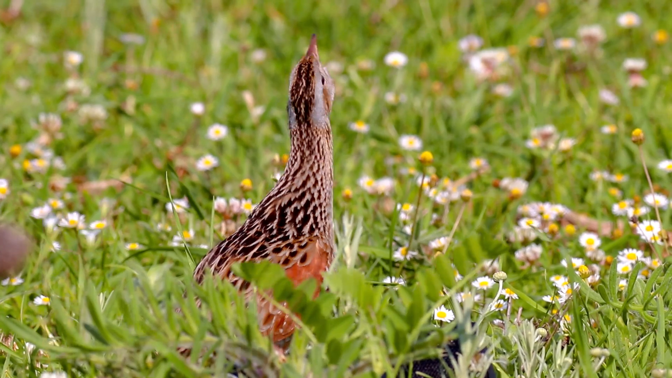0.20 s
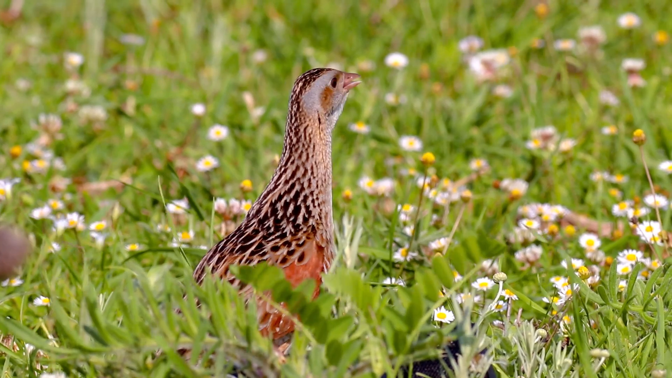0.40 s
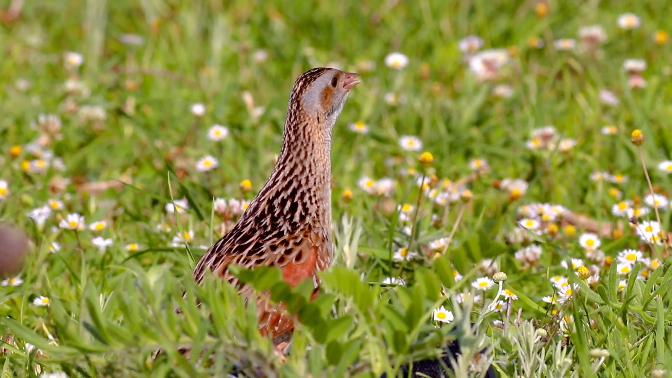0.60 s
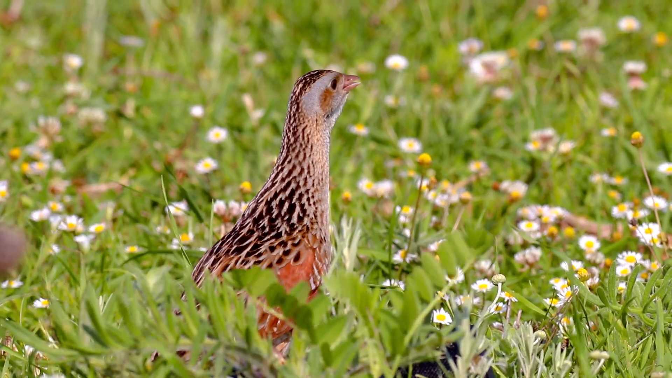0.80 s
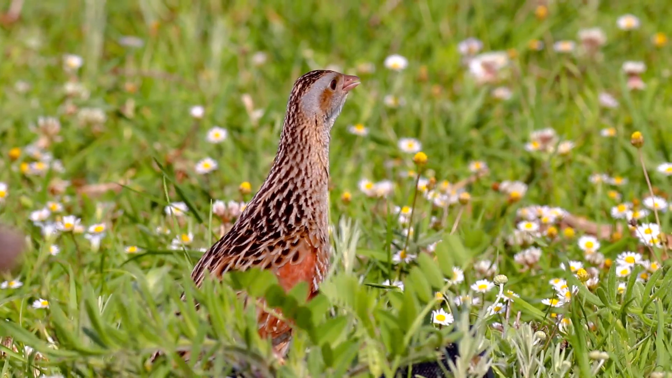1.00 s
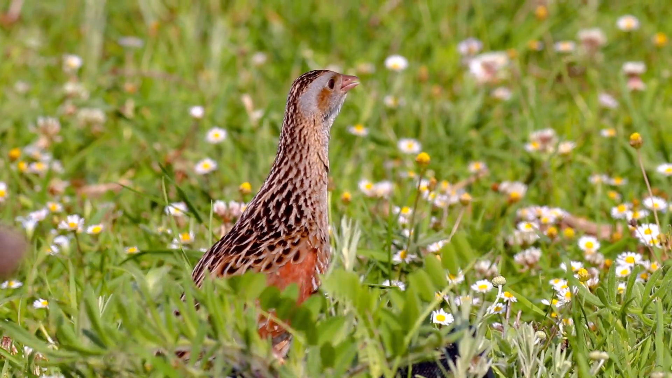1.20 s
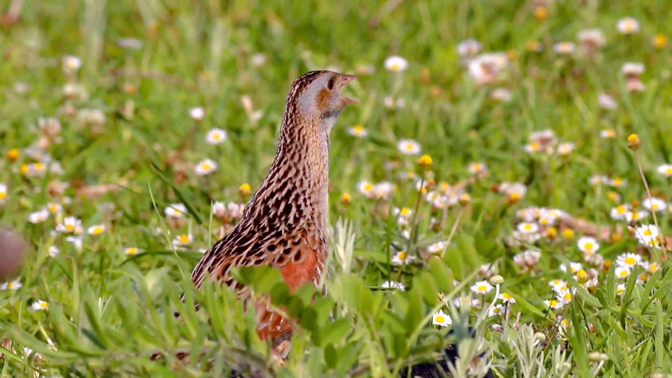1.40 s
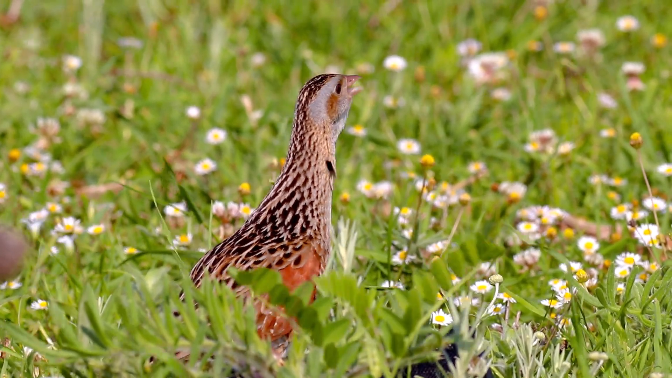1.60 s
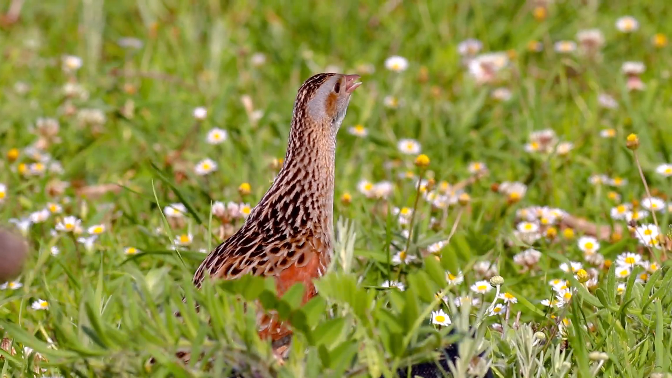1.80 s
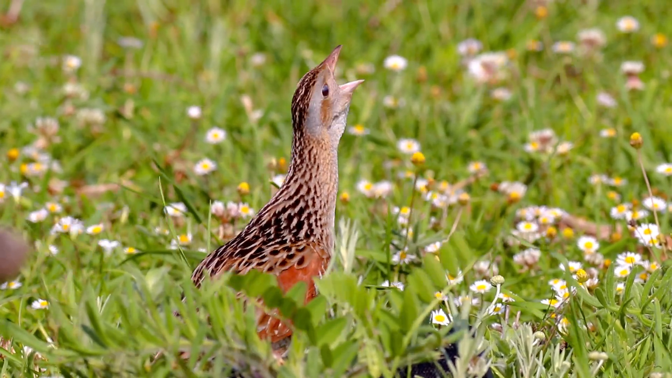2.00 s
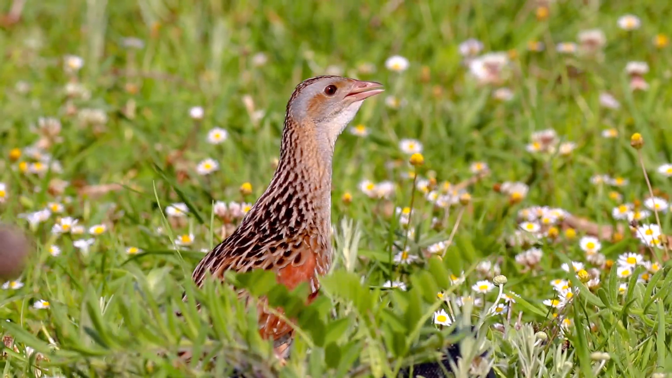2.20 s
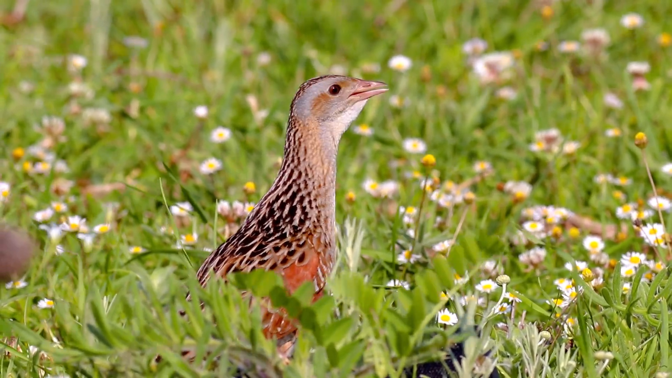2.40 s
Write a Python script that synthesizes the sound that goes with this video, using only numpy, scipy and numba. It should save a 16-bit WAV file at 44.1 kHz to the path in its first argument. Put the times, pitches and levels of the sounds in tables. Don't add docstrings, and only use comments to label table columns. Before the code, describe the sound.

A corn crake rasps from meadow grass in dry, ratcheting bursts, with faint crickets between calls

```python
import sys
import numpy as np
from scipy import signal
from scipy.fft import rfft, irfft
from scipy.io import wavfile
from scipy.ndimage import uniform_filter1d
from numba import njit

SR = 44100
rng = np.random.default_rng(int(sys.argv[2]) if len(sys.argv) > 2 else 0)


def volts_from_db(level):
    exponent = np.asarray(level, float) / 20
    return 10 ** exponent


def log_audio(samples):
    frames = np.atleast_2d(samples).T
    limited = np.clip(frames, -1, 1)
    pcm = np.round(limited * 32767).astype(np.int16)
    wavfile.write(sys.argv[1], SR, pcm)


N = 105840
LEAD = int(.3 * SR)
T60 = np.log(1000)

# start_s, snaps, mean_gap_ms, snaps_until_limp_evens_out, last_gap_drag_ms
RASPS = [
    (-.245, 18, 8.35, 14, 2),
    (.2013, 23, 8.12, 47, 4.3),
    (1.505, 18, 8.35, 14, 2),
    (1.9524, 22, 8.14, 47, 1.8),
]
RASP_LEVELS = [-10.5, -11.5, -12, -12]
# pitch_hz, level_db, t60_ms
WINDPIPE_MODES = [(1940, 5, 6.9), (2388, 5, 13.6), (3150, 9, 6.1), (3485, 6.5, 7.4), (4200, 9, 2.9),
                  (4780, 11, 3.1), (5210, 2, 2.7), (5830, 2, 6.9), (6610, 6, 4.95), (7800, -2, 3)]
# pitch_hz, level_db, t60_ms
FRINGE_MODES = [(1274, -17.5, 23.5), (8520, -10, 3.1), (8820, -9.5, 1.5), (10300, -13.5, 2.1),
                (11500, -26, 1.9), (14600, -36, 1.4)]
# frequency_hz, level_db
HEDGE_COLOUR = [(1500, -7.5), (3000, -8.5), (5500, -1.5), (9000, 3)]
# start_s, level_db
LOW_CHIRPS = [
    (.012, -51),
    (.498, -45),
    (.755, -44),
    (.99, -45),
    (1.25, -47),
    (1.745, -45),
    (2.275, -44),
]
# start_s, level_db
HIGH_CHIRPS = [(.118, -47), (.582, -47), (.81, -47), (1.042, -47), (1.392, -47), (1.61, -47), (1.84, -47),
               (2.305, -47)]
# time_s, level_db
GUSTS = [
    (0, -65),
    (.45, -75),
    (.6, -87),
    (1.6, -72),
    (1.85, -51),
    (2.1, -63),
    (2.3, -39.5),
    (2.4, -55),
]
# frequency_hz, level_db per Hz
FAR_SPECTRUM = [(15, -57), (25, -24), (114, -0.5), (293, -7), (962, -3), (2100, -21), (6500, -24),
                (15000, -35.5)]
# frequency_hz, likeness_0_to_1
FAR_LIKENESS = [(60, 1), (130, .89), (290, 0.8), (640, 0.24), (1400, 0.14)]
# frequency_hz, left_minus_right_db
FAR_BALANCE = [(60, 1), (200, 1), (380, 3), (700, 5), (1290, 5), (2380, .5), (4400, 1.5), (15000, 2)]


def crake():
    out = np.zeros(N + LEAD)
    limp_ms = np.array([-1.28, -.25, 1.53])
    flutter_habit = rng.standard_normal(300)
    for (start, count, gap_ms, even, drag_ms), level_db in zip(RASPS, RASP_LEVELS):
        k = np.arange(round(count))
        gaps_ms = gap_ms + limp_ms[k % 3] * np.clip(1 - k / even, 0, 1)
        gaps_ms -= .72 * (k == 0)
        gaps_ms += drag_ms * np.exp(np.minimum(k - len(k) + 2, 0) / .78)
        times = start + (np.cumsum(gaps_ms) - gaps_ms) / 1000
        for j in k:
            late = 1 - np.exp(-j / 4.5)
            tired_db = .2 * drag_ms ** 2 * (j == k[-1])
            db = level_db + 7 * late - tired_db + .5 * rng.standard_normal()
            add(out, volts_from_db(db) * crake_snap(late, flutter_habit), times[j] + LEAD / SR)
    return out


def crake_snap(late, flutter_habit):
    body = band(ring(WINDPIPE_MODES, late), 1720, 7420, order=7)
    body = band(body, 2500, 15700, order=2)
    low = band(ring(FRINGE_MODES[:1], late), 950, 1500, order=3)
    high = band(ring(FRINGE_MODES[1:], late), 7650, 15000, order=4)
    push = syrinx_push(late, flutter_habit)
    return 10 * unit(signal.fftconvolve(push, body + low + high))


def syrinx_push(late, flutter_habit):
    ms = np.arange(len(flutter_habit)) * 1000 / SR
    habit_share = .75
    fresh = rng.standard_normal(len(ms))
    push = np.sqrt(habit_share) * flutter_habit + np.sqrt(1 - habit_share) * fresh
    push *= np.exp(-(ms / 2.43) ** 2)
    first_db, late_db = -18, -25.5
    push *= volts_from_db(first_db + (late_db - first_db) * late)
    trips = np.arange(4)
    back_ms = trips * (.96 + .03 * rng.standard_normal(4))
    push[(back_ms * SR / 1000).astype(int)] += volts_from_db(-3 * trips)
    return push


def ring(modes, late):
    hz, db, t60_ms = np.array(modes, float).T[:, :, None]
    t = np.arange(900) / SR
    detune, scatter = rng.standard_normal((2, len(modes), 1))
    throat_db = 4 * late * np.sign(hz - 2200) * (abs(hz - 2200) < 400)
    gain = volts_from_db(db + 1.2 * scatter + throat_db)
    tone = np.sin(2 * np.pi * hz * (1 + .01 * detune) * t)
    return -np.sum(gain * tone * np.exp(-T60 * t * 1000 / t60_ms), axis=0)


def meadow(bird):
    t = np.arange(int(.4 * SR)) / SR
    shape = (2, len(t))
    grass = band(rng.standard_normal(shape), 3920, 14400, order=1) * np.exp(-t * 1000 / 3.4)
    near = rng.standard_normal(shape) * np.exp(-T60 * t / .08)
    ir = volts_from_db(-7.5) * unit(grass) + volts_from_db(-15) * unit(near)
    ir[:, 0] = 1
    hedge_s, spread_s = .2, .071
    hedge = rng.standard_normal(shape) * np.exp(-((t - hedge_s) / spread_s) ** 2)
    echo = volts_from_db(-28.5) * pan(-2.5) * colour(unit(hedge), HEDGE_COLOUR)
    ir = ir * pan(-1.5) + echo
    return signal.fftconvolve(bird[None], ir, axes=1)[:, LEAD:LEAD + N]


def crickets():
    return wide(cricket(LOW_CHIRPS, 4780, 480), 1.5) + wide(cricket(HIGH_CHIRPS, 5200, 120), 1.5)


def cricket(chirps, pitch_hz, fall_hz):
    out = np.zeros(N)
    for start, level_db in chirps:
        for k, (louder, sharper, later) in enumerate(rng.standard_normal((3, 3))):
            sound = stroke(pitch_hz + 25 * sharper, fall_hz, .022)
            add(out, volts_from_db(level_db + 1.5 * louder) * sound, start + k * .032 + .001 * later)
    return out


def trill():
    out = np.zeros(N)
    last_s, gap_s = 1.323, .0295
    for k in range(7):
        tick = stroke(5950 - 40 * k, 1040, .0084)
        add(out, volts_from_db(-45 - 1.5 * k) * tick, last_s - k * gap_s)
    return wide(out, 1.3)


def chorus():
    blur = unit(band(rng.standard_normal((2, N)), 4550, 5350, order=2)) * np.sqrt(N)
    return blur * volts_from_db(-54 + .92 * walk(29.8))


def breeze():
    x = colour(rng.standard_normal((2, N)), [(12, -65), (30, 9), (70, 0), (140, -16), (400, -96)])
    x = x[0] + .75 * x[1] * np.array([[1], [-1]])
    s, db = np.array(GUSTS).T
    gust_db = np.interp(np.arange(N) / SR, s, db)
    return unit(x) * np.sqrt(N) * volts_from_db(gust_db + 2.4 * walk(6))


def distance():
    f = np.fft.rfftfreq(N, 1 / SR)
    alike = np.clip(on_log(FAR_LIKENESS, f), 0, 1)
    a, b = rfft(rng.standard_normal((2, N)))
    shared, apart = np.sqrt(1 + alike) * a, np.sqrt(1 - alike) * b
    half_db = on_log(FAR_BALANCE, f) / 2
    spec = np.array([shared + apart, shared - apart])
    spec *= volts_from_db(on_log(FAR_SPECTRUM, f)) * volts_from_db(np.array([half_db, -half_db])) * (f > 20)
    octave, swell = np.log2(np.maximum(f, 1) / 30), walk(.53)
    out = np.zeros((2, N))
    for k in range(11):
        layer = irfft(spec * np.clip(1 - abs(octave - k), 0, 1), N)
        out += layer * volts_from_db(1.5 * swell + .27 * walk(9))
    return out * volts_from_db(-44) / np.sqrt(np.mean(out.mean(0) ** 2))


def stroke(pitch_hz, fall_hz, length_s):
    u = np.arange(int(length_s * SR)) / (length_s * SR)
    phase = 2 * np.pi * np.cumsum(pitch_hz + fall_hz * (.5 - u)) / SR
    return np.sqrt(2) * np.sin(np.pi * u) * np.sin(phase)


def wide(x, left_minus_right_db):
    ir = .6 * unit(rng.standard_normal((2, 900)) * np.exp(-np.arange(900) / 200))
    ir[0, 0], ir[1, 5] = .8, .8
    return signal.fftconvolve(x[None], ir, axes=1)[:, :N] * pan(left_minus_right_db)


def pan(db):
    return volts_from_db(np.array([[db / 2], [-db / 2]]))


def add(out, x, s):
    i = int(s * SR)
    out[i:i + len(x)] += x[:max(len(out) - i, 0)]


def walk(rate_hz):
    k = int(SR / rate_hz)
    steps = np.repeat(rng.standard_normal(N // k + 1), k)
    return .46 * uniform_filter1d(uniform_filter1d(steps, k), k)[:N]


def unit(x):
    return x / np.sqrt(np.sum(x ** 2, axis=-1, keepdims=True))


def band(x, lo_hz, hi_hz, order):
    return signal.sosfilt(signal.butter(order, [lo_hz, hi_hz], "bandpass", fs=SR, output="sos"), x)


def on_log(table, hz):
    t = np.array(table, float)
    return np.interp(np.log(np.maximum(hz, 1)), np.log(t[:, 0]), t[:, 1])


def colour(x, table):
    n = x.shape[-1]
    return irfft(rfft(x) * volts_from_db(on_log(table, np.fft.rfftfreq(n, 1 / SR))), n)


def scene():
    return meadow(crake()) + crickets() + trill() + chorus() + breeze() + distance()


@njit
def follow(x, up, down):
    e, y = x[0], np.empty(len(x))
    for i in range(len(x)):
        e += (x[i] - e) * (up if x[i] > e else down)
        y[i] = e
    return y


def gain_control(x):
    threshold_db, ratio, attack_s, release_s = -34, 1.7, .022, .019
    held = np.sqrt(uniform_filter1d(np.mean(x ** 2, axis=0), size=441, origin=220) + 1e-12)
    over_db = np.maximum(20 * np.log10(held) - threshold_db, 0) * (1 - 1 / ratio)
    return x * volts_from_db(-follow(over_db, 1 / (attack_s * SR), 1 / (release_s * SR)))


def low_pass(x):
    return signal.sosfilt(signal.butter(12, 16520, fs=SR, output="sos"), x)


def record(dry):
    treble_limit = signal.ellip(8, .2, 60, 15700, fs=SR, output="sos")
    mix = signal.sosfilt(treble_limit, gain_control(dry))
    return low_pass(mix)


dry = scene()
out = record(dry)
log_audio(out)
```